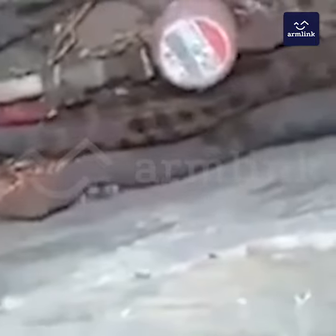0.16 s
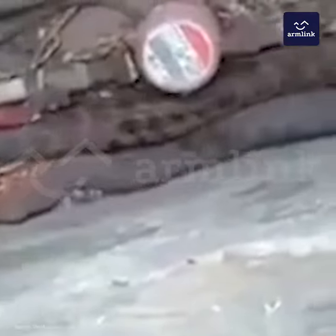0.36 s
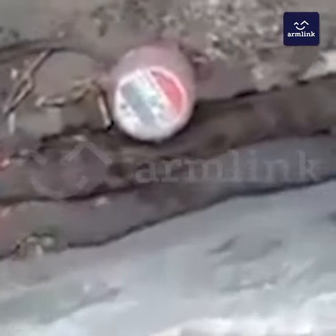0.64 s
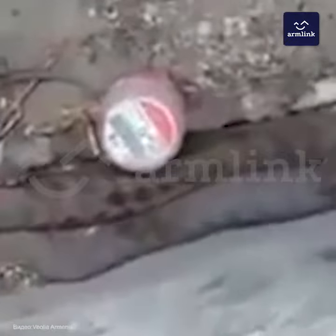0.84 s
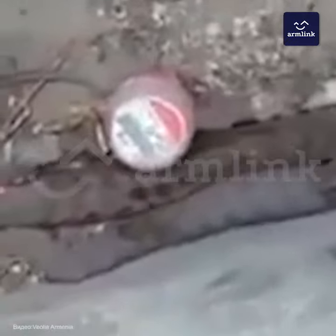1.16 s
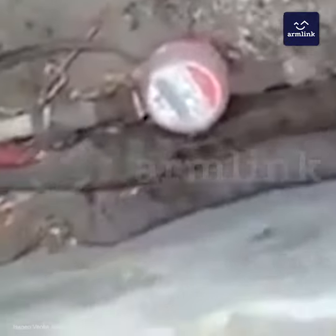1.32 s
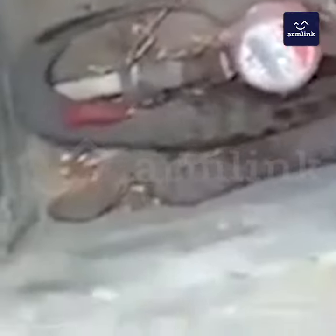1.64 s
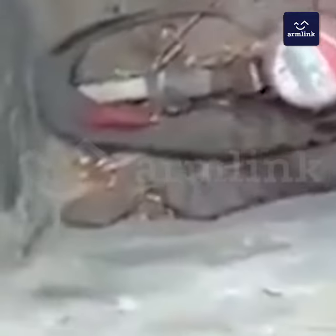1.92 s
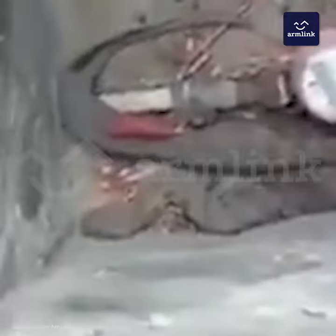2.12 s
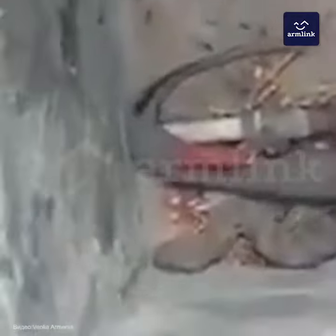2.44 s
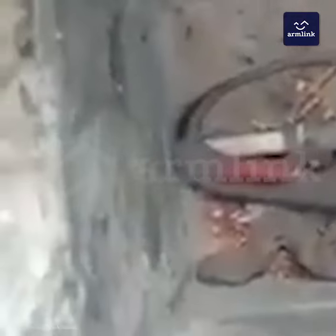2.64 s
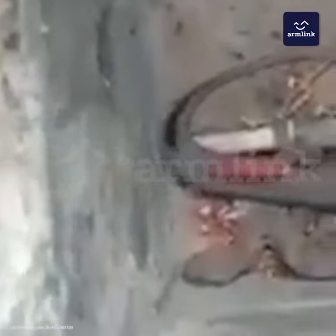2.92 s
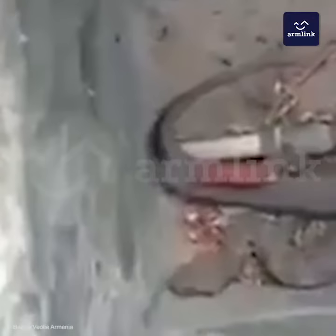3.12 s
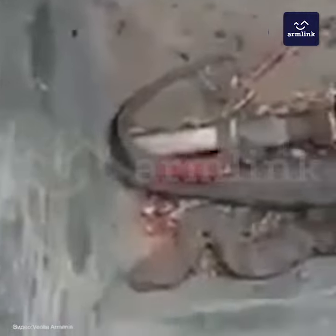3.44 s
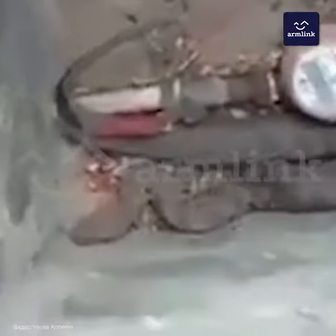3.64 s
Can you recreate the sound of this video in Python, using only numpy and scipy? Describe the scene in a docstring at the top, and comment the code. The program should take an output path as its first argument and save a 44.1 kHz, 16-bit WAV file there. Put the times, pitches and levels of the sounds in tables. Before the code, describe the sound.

Snake hiss in a concrete pit: a hard airy blast, then a quieter, uneven continuing hiss.

```python
"""A hard, close hiss blasts out, then a softer hiss follows with several surges: a snake in a concrete pit.
The air jet is shaped noise, sharpened by resonances in the surges; the airway adds a hollow, fluttering undertone.
Near walls colour the air with fine ripple and shifting notches.
A few soft bumps (thud plus dull knock) sound over a faint low background. The sound is mono."""
import sys
import numpy as np
from scipy import signal
from scipy.io import wavfile

SR = 44100
rng = np.random.default_rng(int(sys.argv[2]) if len(sys.argv) > 2 else 0)


def store_wav(level_fs):
    """Save 16-bit WAV to argv[1]."""
    pcm = np.round(np.clip(np.atleast_2d(level_fs), -1, 1) * 32767)
    wavfile.write(sys.argv[1], SR, pcm.T.astype(np.int16))


N = 166257
SIZE, HOP = 1536, 256  # spectral frame length and step, samples
HZ = np.fft.rfftfreq(SIZE, 1 / SR)  # frequency of each bin
TIME = np.arange(N // HOP + 5) * HOP / SR  # time of each frame, s


def hiss():
    """Turbulent air jet: a blast gives way to a softer hiss; surges, fine ripple and brief dips shape both."""
    # force of the opening blast: t/s, level/dB
    blast = [(0, -43), (.11, -40), (.17, -44), (.37, -42.5), (.6, -43), (.88, -42), (1.12, -43),
             (1.17, -43), (1.27, -45)]
    # spectrum of the blast: f/Hz, relative level/dB
    blast_colour = [(900, -39), (1900, -20.5), (2250, -7.5), (3100, -7.5), (3450, -9.5), (4050, -7.5),
                    (5100, -5), (5600, -2), (6100, 1.5), (6900, -1.5), (9150, -2.5), (9600, -13.5),
                    (10400, -14.5)]
    # force of the softer hiss before its gain: t/s, level/dB
    soft = [(1.2, -57), (1.94, -59.5), (2.05, -56), (2.2, -65), (2.29, -59), (2.45, -66), (2.72, -61),
            (3.22, -60.5), (3.75, -65)]
    # spectrum of the softer hiss: f/Hz, relative level/dB
    soft_colour = [(1000, -41), (2020, -12), (2260, 3), (2900, 2.5), (3600, 2), (4150, 3.5), (4450, -1),
                   (4750, 0.5), (5300, 2), (6100, 3), (7000, -12), (8000, -58)]
    # top fizz of the softer hiss before its gain: t/s, level/dB
    fizz = [(1.36, -70.5), (1.68, -66), (2.09, -69), (2.79, -67.5), (3.77, -69.5)]
    # spectrum of the fizz: f/Hz, relative level/dB
    fizz_colour = [(5500, -13), (6700, 3), (8400, 1.5), (9250, -1.5), (9550, -17), (10400, -21)]
    # breathy middle: t/s, level/dB
    breath = [(0, -55.5), (.55, -58.5), (.75, -62), (.96, -58), (1.14, -62), (1.17, -74), (1.39, -75),
              (1.8, -61), (2.7, -63), (3.13, -64.5), (3.22, -69.5), (3.77, -69)]
    # spectrum of the breathy middle: f/Hz, relative level/dB
    breath_colour = [(400, -41), (800, -0.5), (1800, 3), (2150, 2.5), (2800, -29), (6000, -62)]
    # sibilant surges: start/s, end/s, level/dB, resonance f/Hz, width/Hz
    surges = [(-.12, .75, -47.8, 6150, 580), (.74, 1.17, -52, 3300, 1900), (.79, 1.19, -49.5, 6430, 280),
              (.81, 1.22, -50, 5680, 560), (1.12, 2.45, -63.5, 6910, 80), (1.17, 1.94, -60.5, 3900, 500),
              (1.46, 2, -53.5, 6480, 600), (1.48, 1.96, -60, 7550, 400), (1.9, 2.16, -59.5, 3150, 1000),
              (2.03, 2.44, -56.5, 6350, 640), (2.63, 3.24, -59.5, 5320, 620), (2.62, 3.25, -59, 6010, 480)]
    soft_gain_db, fizz_gain_db = 4.5, 8.5
    blast_end_s, handover_s = 1.22, .16  # the crossfade is centred on the end of the blast
    jet_low_hz = 600  # the jet loses its bass below this
    ripple_db, ripple_drift_s, ripple_span_hz = 3.4, .24, 38
    dip_db, dip_s, dip_span_hz = 17, .1, 85
    patch_db, flicker_db = 1.0, .3

    handover = ramp(TIME - blast_end_s + handover_s / 2, handover_s)
    layers = [(1 - handover) * level(blast) * colour(blast_colour),
              amp(soft_gain_db) * handover * level(soft) * colour(soft_colour),
              amp(fizz_gain_db) * handover * level(fizz) * colour(fizz_colour),
              level(breath) * colour(breath_colour)]
    layers += [surge(*row) for row in surges]
    jet = np.sqrt(sum(layer ** 2 for layer in layers))  # the layers add in power
    jet = jet * np.minimum(HZ / jet_low_hz, 1) ** 3

    # fine ripple that the walls put on the hiss, its crests limited
    ripple = ripple_db * np.minimum(drift(ripple_drift_s, ripple_span_hz), 2)
    turbulence = patch_db * drift(0.024, 710) + flicker_db * drift(0.028, 2400)
    # only the strongest swings of the random field become dips
    dips = dip_db * np.maximum(drift(dip_s, dip_span_hz) - .8, 0)
    return air(jet * amp(turbulence + ripple - dips))


def surge(start, end, db, hz, width):
    """The jet sharpens into one resonance for a while, with less bass below it."""
    rise_s, fall_s = .11, .09
    spectrum = unit(resonance(hz, width) * np.minimum(HZ / hz, 1))
    envelope = ramp(TIME - start, rise_s) * ramp(end - TIME, fall_s)
    return amp(db) * envelope * spectrum


def undertone():
    """Fluttering air in the low resonances of the airway; the one near 650 Hz slowly takes over."""
    # hollow undertone before its trim: t/s, level/dB
    hollow_level = [(0.03, -53), (0.62, -61), (0.72, -64), (0.94, -50.5), (1.1, -53), (1.22, -65.5),
                    (1.95, -56.5), (2.57, -58), (2.68, -62.5), (2.79, -53.5), (2.82, -58), (3.13, -60),
                    (3.16, -72.5), (3.59, -68), (3.77, -60)]
    # airway resonances: f/Hz, width/Hz, relative level at the start/dB, relative level at the end/dB
    airway = [(336, 60, -9.5, -26.5), (647.4, 62, -1, 1.5), (800, 144, 6, -34.5), (900.7, 44, 7, -2)]
    trim_db, flutter_db = -3.0, 2.5
    late = (TIME / TIME[-1])[:, None]  # 0 at the start, 1 at the end
    power = 0
    for hz, width, first, last in airway:
        power = power + (amp(first + (last - first) * late) * resonance(hz, width)) ** 2
    tube = np.sqrt(power / power.mean(1, keepdims=True))  # constant power in every frame
    flutter = amp(flutter_db * drift(0.02, 270))
    return air(amp(trim_db) * level(hollow_level) * tube * flutter)


def bumps():
    """Each bump is a soft low thud and a short dull knock of decaying modes."""
    # soft bumps: t/s, thud level/dB, knock level/dB
    bump_rows = [(.376, -61, -44.5), (.403, -69, -59), (0.632, -67.5, -78), (1.119, -56, -68),
                 (2.018, -68.5, -62), (2.665, -69, -90), (3.218, -66, -63)]
    # modes of a knock: f/Hz, relative level/dB, decay by 60 dB/s
    knock_modes = [(230, -5.5, 0.019), (340, -3, 0.1), (455, 3, 0.019), (663, 1.5, 0.057), (1620, 8, 0.012)]
    thud_hz, thud_rise_s, knock_rise_s = 97.5, 0.022, 0.0039
    out, t = np.zeros(N), np.arange(SR // 4) / SR
    swell = (t / thud_rise_s) ** 2 * np.exp(1 - (t / thud_rise_s) ** 2)
    thud = swell * np.sin(2 * np.pi * thud_hz * t)
    for s, thud_db, knock_db in bump_rows:
        ring = np.zeros(len(t))
        for hz, db, t60 in knock_modes:
            decay = np.exp(-np.log(1000) * t / t60)
            ring += amp(db) * decay * np.sin(2 * np.pi * (hz * t + rng.random()))  # random phase
        knock = ring * np.minimum(t / knock_rise_s, 1)
        add(out, s, amp(thud_db) * thud + amp(knock_db) * knock)
    return out


def background():
    """Faint, uneven low rumble in the pit: noise with a drifting spectrum."""
    # spectrum of the background: f/Hz, relative level/dB
    floor = [(20, -14), (70, 0), (100, 4), (145, -10), (220, -10), (350, -4), (480, -10), (1000, -18),
             (9000, -36)]
    floor_db, lumpy_db = -80.5, 3
    return air(amp(floor_db + lumpy_db * drift(.055, 140)) * colour(floor))


def hollowed(x):
    """Cuts narrow hollows, which the near walls cause, into a sound in two passes for steep sides."""
    # hollows that come and go: start/s, end/s, f at the start/Hz, f at the end/Hz, width/Hz
    notches = [(-.03, .19, 3720, 3580, 280), (.06, .58, 1990, 1950, 140), (.14, .33, 3380, 3370, 130),
               (.34, .6, 3390, 3460, 220), (.3, .68, 5100, 4990, 90), (.82, 1.18, 3860, 3780, 90),
               (1.15, 1.31, 2970, 3000, 170), (1.27, 1.47, 4530, 4480, 210), (1.2, 1.39, 1120, 1085, 105),
               (1.41, 1.64, 1100, 1270, 210), (1.84, 2.43, 3840, 3680, 115), (2.04, 2.3, 5000, 4970, 170),
               (2.22, 2.43, 4380, 4320, 170), (2.22, 2.52, 1750, 1720, 85), (2.65, 2.95, 6650, 6330, 140),
               (2.92, 3.31, 4350, 4470, 160), (3.02, 3.54, 4020, 3990, 85), (3.28, 3.48, 4510, 4430, 270),
               (3.33, 3.7, 1110, 1085, 65), (3.41, 3.64, 3300, 3540, 170)]
    notch_db = 43  # depth over both passes
    half_cut = amp(-notch_db / 2 * sum(hollow(*row) for row in notches))
    return shaped(shaped(x, half_cut), half_cut)


def hollow(start, end, from_hz, to_hz, width):
    """A narrow notch that opens, glides and closes; 1 at its deepest."""
    fade_s = .08
    centre = np.interp(TIME, (start, end), (from_hz, to_hz))[:, None]
    opening = ramp(TIME - start, fade_s) * ramp(end - TIME, fade_s)
    return opening * 2 ** -(2 * (HZ - centre) / width) ** 2


def air(gain):
    """Turbulent noise shaped by a gain for each frame and frequency."""
    return shaped(rng.standard_normal(N), gain)


def shaped(x, gain):
    """Filters a sound by a gain for each frame and frequency."""
    padded = np.pad(x, (0, (len(TIME) - 1) * HOP - N))
    z = signal.stft(padded, nperseg=SIZE, noverlap=SIZE - HOP)[2]
    return signal.istft(z * gain.T, nperseg=SIZE, noverlap=SIZE - HOP)[1][:N]


def drift(seconds, span_hz):
    """A smooth random field over time and frequency, rms 1."""
    z = rng.standard_normal((len(TIME), len(HZ)))
    # widths in frames and in bins
    for axis, width in enumerate((seconds * SR / HOP, span_hz * SIZE / SR)):
        kernel = np.exp(-2 * (np.arange(-200, 201) / width) ** 2)
        z = signal.fftconvolve(z, np.expand_dims(kernel, 1 - axis), "same", axes=axis)
    return unit(z)


def resonance(hz, width):
    """The gain of a resonance over frequency, 1 at its peak."""
    return 1 / (1 + ((HZ - hz) / (width / 2)) ** 2 / 2)


def colour(points):
    """A spectrum of unit power, drawn in dB over log frequency."""
    f, db = np.transpose(points)
    return unit(amp(np.interp(np.log(HZ + 1), np.log(f), db)))


def level(points):
    """A dB curve as a gain for every frame."""
    return amp(np.interp(TIME, *np.transpose(points)))[:, None]


def ramp(t, length):
    """Rises from 0 to 1 over the given length."""
    return np.clip(t / length, 0, 1)[:, None]


def amp(db):
    """Decibels to gain."""
    return 10 ** (np.asarray(db) / 20)


def unit(x):
    """Scales to rms 1."""
    return x / np.sqrt(np.mean(x ** 2) + 1e-20)


def add(mix, s, sound):
    """Mixes a sound in at time s."""
    part = mix[max(round(s * SR), 0):][:len(sound)]
    part += sound[:len(part)]


def scene():
    """The hollows cut all the air sounds, the bumps stay clear; the same in both channels."""
    airborne = hollowed(hiss() + undertone() + background())
    return np.tile(airborne + bumps(), (2, 1))


def record(dry):
    """The recorder's band limit: a steep low-pass."""
    edge_hz = 10180
    low_pass = signal.firwin(511, edge_hz, window=("kaiser", 8), fs=SR)
    return signal.oaconvolve(dry, low_pass[None], "same")


dry = scene()
out = record(dry)
store_wav(out)
```